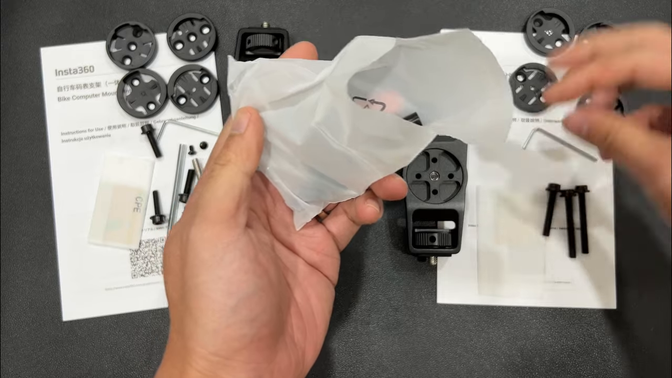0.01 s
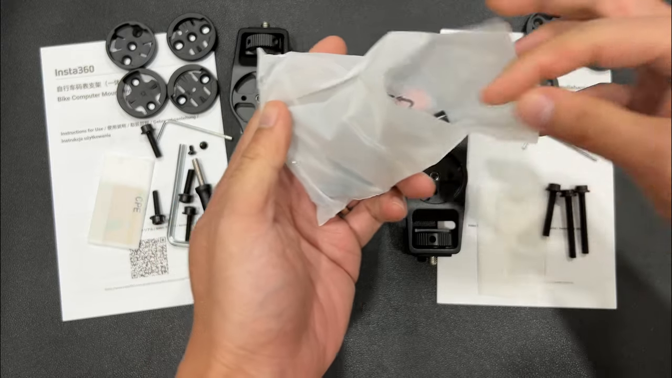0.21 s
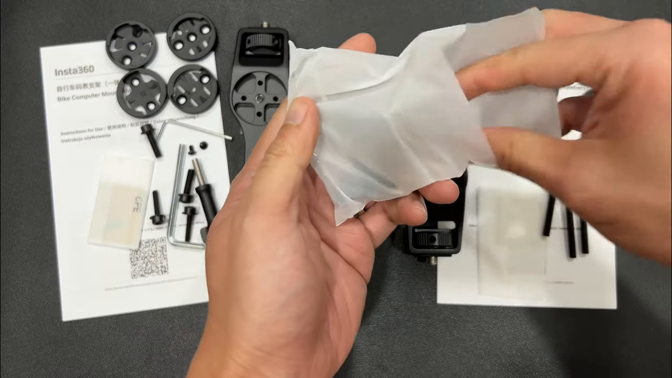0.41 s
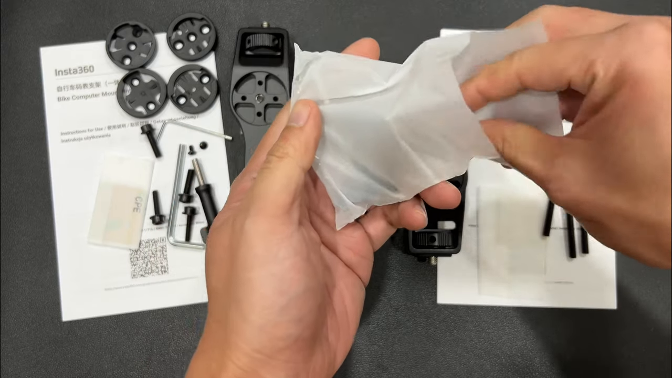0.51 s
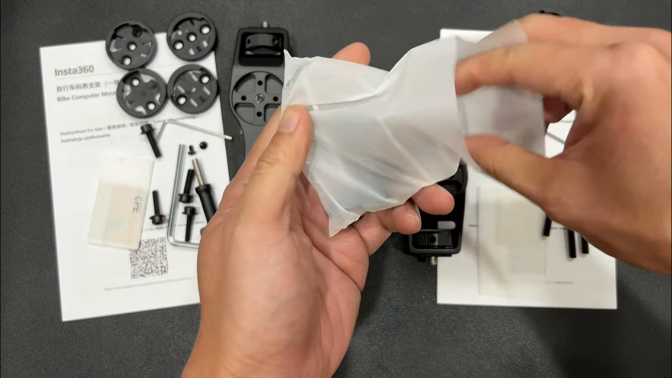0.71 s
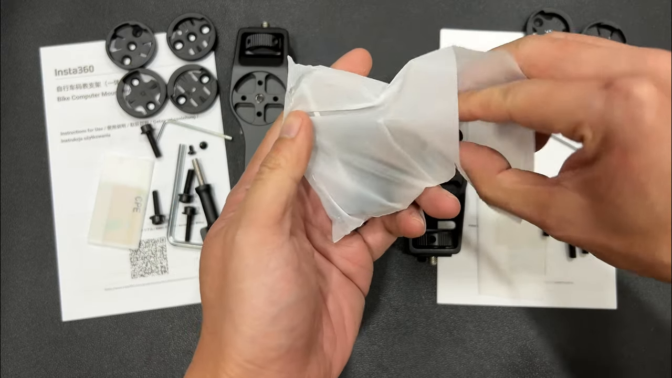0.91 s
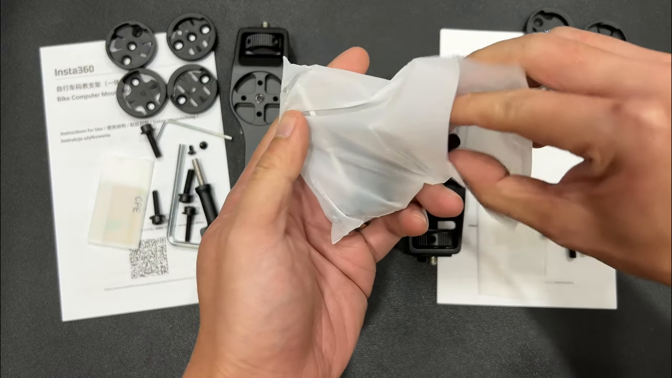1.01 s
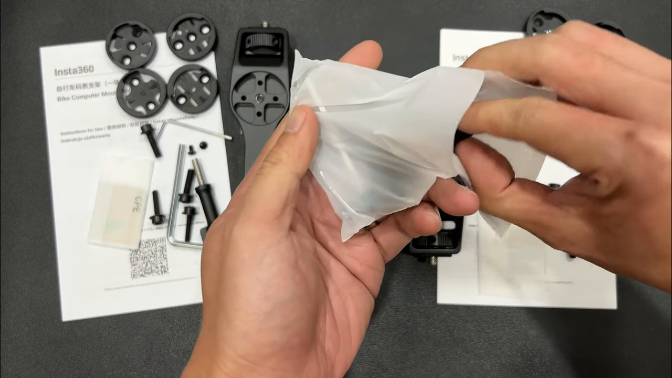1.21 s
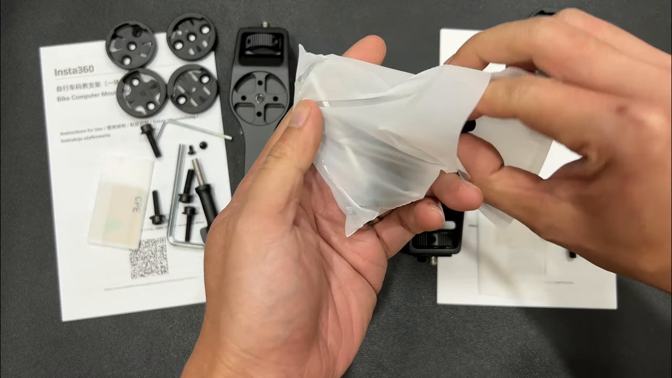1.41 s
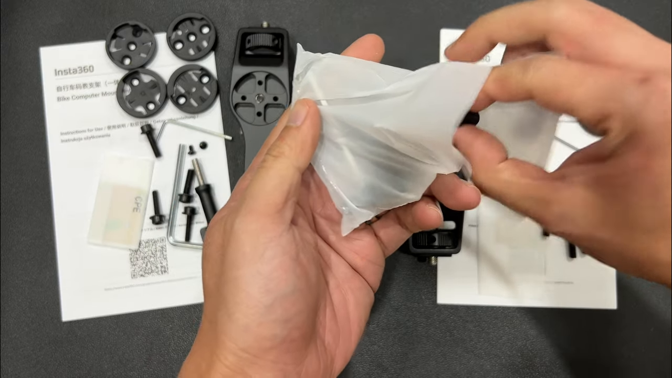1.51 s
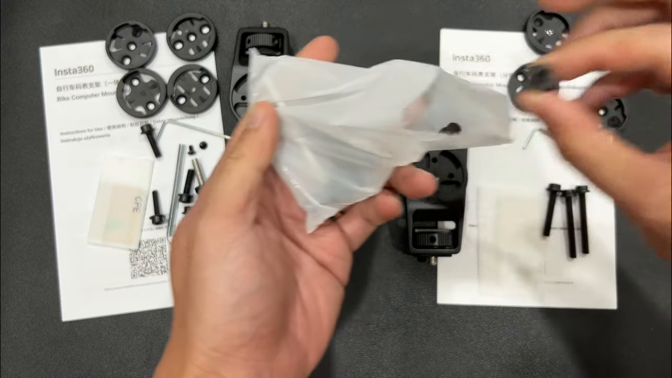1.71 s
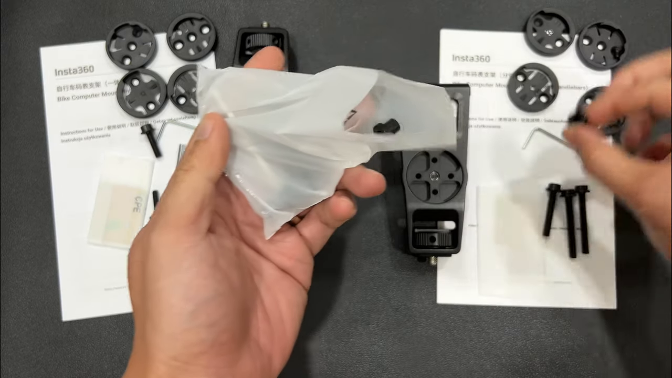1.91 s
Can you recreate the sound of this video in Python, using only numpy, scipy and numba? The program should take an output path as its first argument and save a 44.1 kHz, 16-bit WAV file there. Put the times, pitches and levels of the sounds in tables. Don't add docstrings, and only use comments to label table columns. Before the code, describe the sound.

Crisp plastic film rustle and snapping creases, busiest before one second, then thinning to near silence

```python
import sys
import numpy as np
from scipy import signal
from scipy.fft import rfft, irfft
from scipy.io import wavfile
from scipy.ndimage import uniform_filter1d, minimum_filter1d
from numba import njit

SR = 44100
rng = np.random.default_rng(int(sys.argv[2]) if len(sys.argv) > 2 else 0)


def undo_db(level):
    steps = np.asarray(level, float) / 20
    return 10 ** steps


def wrap_up_sound(samples):
    columns = np.atleast_2d(samples).T
    tamed = np.clip(columns, -1, 1)
    steps = np.round(tamed * 32767).astype(np.int16)
    wavfile.write(sys.argv[1], SR, steps)


N = 85995

# f/Hz, level/dB, t60/s
METAL_PARTIALS = [
    (7000, -86, .25),
    (11165, -86, 0.42),
]
# f/Hz, level/dB (per Hz)
ROOM_TONE = [(32, -49), (85, -9), (200, 3), (400, -14), (2300, -37), (2800, -45), (12500, -51),
             (15500, -71)]
# t/s, level/dB, dullness/(dB per octave)
RUBBING = [(0.193, -112.5, 12), (0.199, -58.5, 2.5), (0.229, -56.5, -0.5), (0.368, -55.5, -1.5),
           (0.407, -48.5, 2.5), (0.446, -56.5, 3), (0.5, -50, 1.5), (.64, -61.5, 1), (.69, -46, 1.5),
           (.77, -54.5, 2.5), (.9, -57, 0), (1.12, -61.5, 3), (1.27, -65, 2.5), (1.5, -56.5, 1.5),
           (1.688, -57.5, 2), (1.771, -81.5, 6.5), (1.885, -83.5, 6.5), (1.9, -76, 5.5)]
# f/Hz, level/dB (per Hz)
FILM_TONE = [(180, -30), (300, 2), (701, -8.5), (1170, -4.5), (1510, -21.5), (2280, -5.5), (7320, -7.5),
             (16000, -6)]
# t/s, ring peak level/dB, ring f/Hz, crack peak level/dB
DIG_SNAPS = [(0.198, -48, 6750, -66), (0.216, -36, 3250, -36), (0.3956, -38.5, 2200, -51),
             (0.41, -35, 1720, -51), (0.4206, -35, 1920, -59), (0.4243, -36.5, 2450, -63),
             (0.4646, -33, 2860, -35.5), (0.4796, -37, 1110, -31), (0.4844, -33.5, 2280, -26),
             (0.4876, -65, 910, -26), (0.506, -32, 2330, -30.5), (0.5176, -38, 1040, -57),
             (0.5567, -39, 2080, -40), (0.57, -33, 1206, -42.5), (0.584, -28, 2030, -29.5),
             (0.6531, -30.5, 2400, -29.5), (0.6829, -20, 8100, -20), (0.694, -25, 6450, -30),
             (0.6995, -43, 3640, -31), (0.7063, -27, 3500, -28), (0.7167, -38, 970, -30),
             (0.7233, -32, 2110, -38), (0.739, -35, 970, -31), (0.7434, -53, 6400, -29.5),
             (0.7494, -30, 2170, -27), (0.7604, -33, 1020, -29), (0.7627, -26, 2010, -33),
             (0.7665, -26.5, 920, -28.5), (0.804, -23.5, 2580, -34.5), (0.8472, -37.5, 2400, -36)]
# t/s, ring peak level/dB, ring f/Hz, crack peak level/dB
PULL_SNAPS = [(0.872, -25, 5930, -28), (0.8802, -18, 6700, -26), (0.893, -35, 7350, -32),
              (0.8993, -41, 1165, -48), (0.93, -33, 7400, -35.5), (1.0239, -20, 4280, -26.5),
              (1.036, -35.5, 4130, -43), (1.1586, -33, 6300, -35), (1.1631, -52, 920, -31),
              (1.178, -39.5, 1900, -41), (1.1957, -40.5, 820, -50), (1.2202, -38, 2160, -62),
              (1.2256, -41.5, 900, -50), (1.2684, -39, 833, -28.5), (1.3565, -42, 9200, -45),
              (1.3723, -35.5, 1180, -32), (1.3827, -42.5, 1130, -44), (1.4203, -50, 6500, -39.5),
              (1.4582, -68, 910, -60), (1.48, -43, 5000, -43), (1.5009, -37, 2330, -69),
              (1.52, -59, 920, -42), (1.535, -43, 920, -64), (1.5741, -39, 2330, -37),
              (1.6051, -37, 2200, -37), (1.6542, -38, 2040, -71), (1.682, -36, 2040, -68.5),
              (1.7158, -52.5, 1310, -54), (1.8629, -47.5, 2600, -72), (1.8792, -46, 2350, -50)]
# t/s, ring peak level/dB, ring f/Hz, crack peak level/dB
SMALL_SNAPS = [(0.201, -48, 3600, -49), (0.233, -43, 4500, -48), (0.4105, -35.5, 6500, -32.5),
               (0.6309, -47, 1100, -51), (0.6524, -26.5, 6800, -54), (0.6665, -40, 9000, -38),
               (0.684, -26.5, 3420, -60), (0.6836, -35, 5500, -60), (0.6932, -28, 5500, -40),
               (0.7065, -37, 7200, -60), (0.7995, -39, 11100, -47), (0.8045, -28.5, 3700, -58.5),
               (0.8045, -37, 7200, -60), (0.874, -40.5, 1030, -62), (1.0245, -29, 6900, -66),
               (1.0798, -51.5, 2380, -44.5), (1.2205, -40.5, 7200, -43), (1.2684, -33, 2180, -58),
               (1.2695, -41.5, 1010, -60), (1.3723, -35.5, 2330, -60), (1.3725, -32, 6860, -58),
               (1.4285, -46, 2550, -56), (1.4605, -50, 2280, -64), (1.4744, -47, 2790, -57),
               (1.4815, -41, 7100, -45), (1.5225, -41, 4500, -38), (1.5455, -42, 2160, -67),
               (1.6065, -36, 8050, -63), (1.6445, -43, 1190, -65), (1.6675, -60, 5800, -60),
               (1.6825, -42.5, 3880, -58), (1.717, -59, 3700, -51), (1.7518, -59, 2400, -75),
               (1.833, -60, 3800, -77), (1.8637, -47.5, 4100, -75), (1.8655, -56, 1050, -77),
               (1.88, -44.5, 6500, -77), (1.893, -55, 4300, -70), (1.9375, -56, 2700, -76)]
# t/s, peak level/dB, f/Hz
PANEL_POPS = [(0.38, -45.5, 267), (0.401, -38, 480), (0.4197, -46.5, 860), (0.4854, -30, 460),
              (0.5018, -47, 345), (0.5151, -53, 830), (0.6557, -36.5, 700), (0.6848, -32, 403),
              (0.7043, -55, 413), (0.717, -44, 830), (0.7369, -40, 830), (0.748, -36, 293),
              (0.7678, -50.5, 870), (1.1641, -43, 427), (1.2248, -44, 460), (1.2675, -37, 630),
              (1.5045, -42.5, 445), (1.5244, -43, 434), (1.5375, -41.5, 447), (1.6106, -39.5, 540),
              (1.6806, -38, 636), (1.937, -53, 600)]
# f/Hz, level/dB
DIFFUSE_SHARE = [(60, -25), (350, -10.5), (700, 1), (1100, -7), (2000, -20), (3100, -6), (4200, -7.5),
                 (6000, -8.5)]
# f/Hz, phase/rad
PORT_LEAD = [(300, 0), (600, -.5), (950, .3), (1500, -.1), (4200, .2), (5500, -1), (7300, -1.3),
             (12000, -1.55)]
# f/Hz, level/dB
PHONE_TONE = [(1100, 0.5), (1600, 0), (2300, 1.5), (3000, 0.5), (5000, -3), (7000, 2), (9500, 1.5),
              (14000, 1.5)]
# low f/Hz, high f/Hz, margin level/dB
MUTED_BANDS = [
    (11800, 13200, -48),
    (13200, 15000, -53),
    (15000, 16000, -52),
]

METAL_STOPS_S = .062
ROOM_DB, ROOM_WAVER_DB, STIR_DB, STIR_HZ = -58, .5, -4.5, 119.6
GRAINS_PER_S, GRAIN_SPREAD_DB, CRACKLE_PER_S, CRACKLE_DB = 5000, 3.3, 450, -5
AIR_DB, RUB_TOP_HZ = 5, 15900
HARD_DB, STICK_S, STICK_DB = -28, .011, 9
SNAP_RISE_S, SNAP_S, AFTER_S, AFTER_DB = .0001, .00065, .004, -21
RING_WIDTH, SPIKE, WIDE_HZ, CRACK_TOP_HZ = .42, 2.0, 1800, 10000
BAG_HZ, BAG_WIDTH_HZ, BAG_DB = 2330., 620, -25.5
POP_WIDTH, POP_S = .6, .0015
TABLE_S, TABLE_DB, SPREAD_DB = .00085, -12, -9
TOP_HZ = 16500
AHEAD_FRAMES, EDGE_HZ, EDGE_OPENS_DB = 21, 15950, -6


def unit(x):
    return x / np.sqrt(np.mean(x ** 2))


def peak(x):
    return x / np.abs(x).max()


def read(table, hz):
    points = np.array(table)
    return np.interp(np.log(hz), np.log(points[:, 0]), points[:, 1])


def bins():
    return np.maximum(np.arange(N // 2 + 1) * SR / N, 1)


def band_pass(x, order, low_hz, high_hz):
    return signal.sosfilt(signal.butter(order, [low_hz, high_hz], "band", fs=SR, output="sos"), x)


@njit
def resonate(x, hz, width):
    y, band, low = np.empty(len(x)), 0., 0.
    g, k = np.tan(np.pi * hz / SR), width / hz
    for i in range(len(x)):
        v = (band + g * (x[i] - low)) / (1 + g * (g + k))
        band, low, y[i] = 2 * v - band, low + 2 * g * v, k * v
    return y


def walk(rate):
    hold = int(SR / rate)
    steps = np.repeat(rng.standard_normal(N // hold + 1), hold)
    return 4.28 * uniform_filter1d(uniform_filter1d(steps, hold), hold)[:N]


def ticks(rate, spread_db):
    chance, side, size = rng.random((3, N))
    level_db = np.minimum(-spread_db * np.log(1 - size), 4 * spread_db)
    return (chance < rate / SR) * np.sign(side - .5) * undo_db(level_db)


def metal():
    t = np.arange(N) / SR
    return sum((t < METAL_STOPS_S) * undo_db(db - 60 * t / t60) * np.sin(2 * np.pi * hz * t)
               for hz, db, t60 in METAL_PARTIALS)


def room():
    air = unit(irfft(rfft(rng.standard_normal((2, N))) * undo_db(read(ROOM_TONE, bins())), N))
    rub = np.array(RUBBING)
    rub_db = np.interp(np.arange(N) / SR, rub[:, 0], rub[:, 1])
    busy = np.clip((rub_db + 95) / 40, .75, 1)
    low = unit(band_pass(rng.standard_normal((2, N)), 2, 58, STIR_HZ))
    stir = undo_db(STIR_DB + ROOM_WAVER_DB * walk(2.4)) * busy * low
    return undo_db(ROOM_DB + ROOM_WAVER_DB * walk(14)) * (air + stir)


def rustle():
    t, rub = np.arange(N) / SR, np.array(RUBBING)
    level = np.interp(t, rub[:, 0], rub[:, 1])
    dull = np.interp(t, rub[:, 0], rub[:, 2])
    for at, _, _, crack_db in DIG_SNAPS + PULL_SNAPS + SMALL_SNAPS:
        level = level - STICK_DB * (crack_db > HARD_DB) * (t > at - STICK_S) * (t < at)

    fizz = np.exp(-np.arange(256) / SR / .0009)
    crackle = []
    for _ in range(3):
        swells = signal.fftconvolve(np.abs(ticks(CRACKLE_PER_S, 0.93)), fizz)[:N]
        crackle.append(swells * rng.standard_normal((2, N)))

    out, norm, swell = 0, 0, walk(55)
    for k, hz in enumerate(350 * 2 ** np.arange(0, 5.6, .4)):
        grains = np.array([ticks(GRAINS_PER_S, GRAIN_SPREAD_DB) for _ in range(2)])
        drive = unit(grains) + undo_db(CRACKLE_DB) * unit(crackle[k // 5])
        band = unit(np.array([resonate(v, hz, hz * 0.55) for v in drive]))
        gain = undo_db(read(FILM_TONE, hz) - AIR_DB * (hz > 11000)) * np.sqrt(hz)
        motion_db = -dull * np.log2(hz / 4000) + .55 * swell + 1.1 * walk(30)
        out = out + gain * undo_db(motion_db) * band
        norm = norm + gain ** 2
    top_cut = signal.ellip(8, .2, 40, RUB_TOP_HZ, fs=SR, output="sos")
    return signal.sosfilt(top_cut, undo_db(level) * out / np.sqrt(norm))


def snaps(table):
    out, t = np.zeros(N + 2048), np.arange(2048) / SR
    shape = (1 - np.exp(-t / SNAP_RISE_S)) * np.exp(-t / SNAP_S) + undo_db(AFTER_DB) * np.exp(-t / AFTER_S)
    for at, ring_db, hz, crack_db in table:
        smooth, rough = rng.standard_normal((2, len(t)))
        width = RING_WIDTH * hz
        ring = resonate(resonate(smooth * shape, 1. * hz, width), 1. * hz, 2 * width)
        spikes = np.sign(rough) * np.abs(rough) ** SPIKE * shape
        crack = band_pass(spikes, 1, WIDE_HZ, CRACK_TOP_HZ)
        crack = crack + undo_db(BAG_DB) * resonate(crack, BAG_HZ, BAG_WIDTH_HZ)
        k = int(at * SR)
        out[k:k + len(t)] += undo_db(ring_db - 0.5) * peak(ring) + undo_db(crack_db + 4.5) * peak(crack)
    return out[:N]


def pops():
    out, t = np.zeros(N + 2048), np.arange(2048) / SR
    for at, db, hz in PANEL_POPS:
        push = rng.standard_normal(len(t)) * t * np.exp(-t / POP_S)
        hollow = resonate(resonate(push, 1. * hz, POP_WIDTH * hz), 1. * hz, 1. * hz)
        k = int(at * SR)
        out[k:k + len(t)] += undo_db(db) * peak(hollow)
    return out[:N]


def scene():
    clicks = snaps(DIG_SNAPS) + snaps(PULL_SNAPS) + pops() + snaps(SMALL_SNAPS)
    scatter = rng.standard_normal(512) * np.exp(-np.arange(512) / SR / 0.002)
    late = undo_db(SPREAD_DB) * signal.fftconvolve(clicks, scatter / np.linalg.norm(scatter))[:N]
    hz = bins()
    mirror = undo_db(TABLE_DB) * np.exp(-2j * np.pi * hz * TABLE_S)
    bag = rfft(np.array([clicks, late]) + rustle()) * (1 + mirror)
    direct, diffuse = bag + rfft(room() + metal())
    sides = np.array([[1], [-1]])
    ports = direct + sides * undo_db(read(DIFFUSE_SHARE, hz)) * diffuse
    return irfft(ports * np.exp(.5j * read(PORT_LEAD, hz) * sides), N)


def starve(x):
    hz, _, z = signal.stft(x, SR, nperseg=512, noverlap=384)
    power = np.abs(z.mean(axis=0)) ** 2 + 1e-18
    loud_db = 10 * np.log10(power[hz > 1500].sum(axis=0))
    coming_db = -minimum_filter1d(-loud_db, size=AHEAD_FRAMES, origin=-AHEAD_FRAMES // 3)
    for low_hz, high_hz, margin_db in MUTED_BANDS:
        band = (hz >= low_hz) & (hz < high_hz)
        band_db = 10 * np.log10(uniform_filter1d(power[band].mean(axis=0), size=5))
        z[:, band] *= band_db - coming_db > margin_db
    edge = hz >= EDGE_HZ
    edge_db = 10 * np.log10(power[edge].sum(axis=0))
    z[:, edge] *= edge_db > edge_db.max() + EDGE_OPENS_DB
    return signal.istft(z, SR, nperseg=512, noverlap=384)[1][:, :N]


def low_pass(x):
    return signal.sosfilt(signal.butter(12, 16990, fs=SR, output="sos"), x)


def record(dry):
    x = signal.sosfilt(signal.ellip(8, .2, 60, TOP_HZ, fs=SR, output="sos"), dry)
    x = irfft(rfft(x) * undo_db(read(PHONE_TONE, bins())), N)
    return low_pass(starve(x))


dry = scene()
out = record(dry)
wrap_up_sound(out)
```